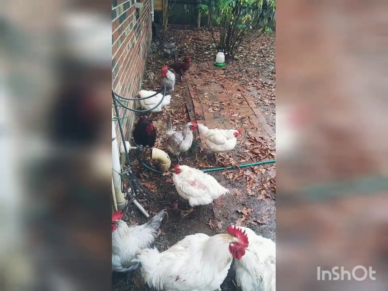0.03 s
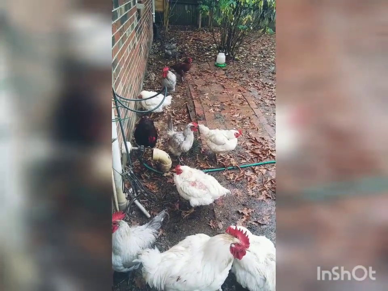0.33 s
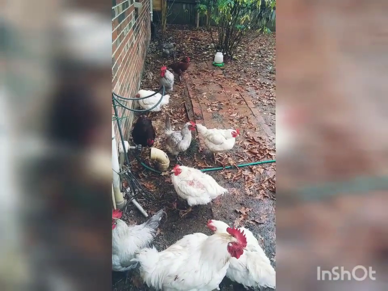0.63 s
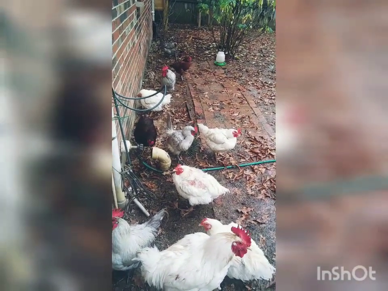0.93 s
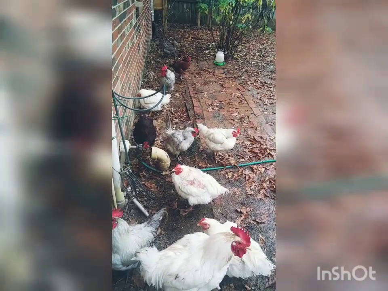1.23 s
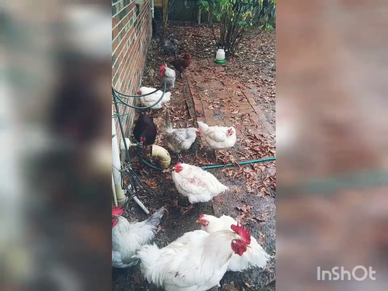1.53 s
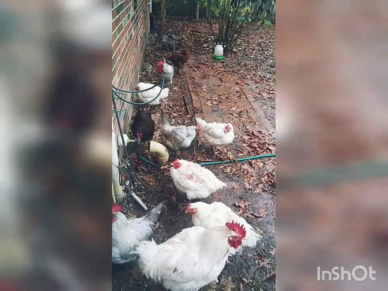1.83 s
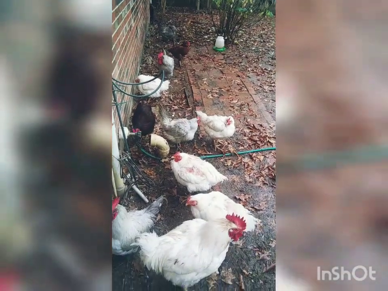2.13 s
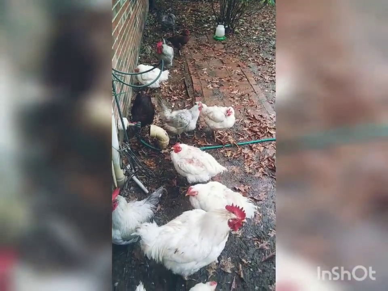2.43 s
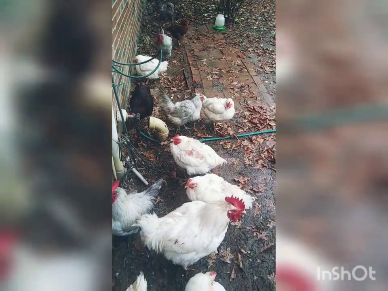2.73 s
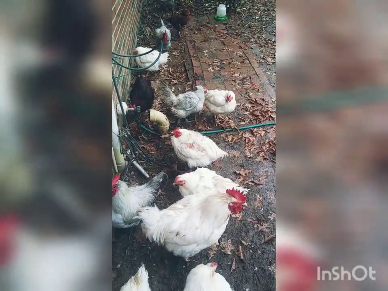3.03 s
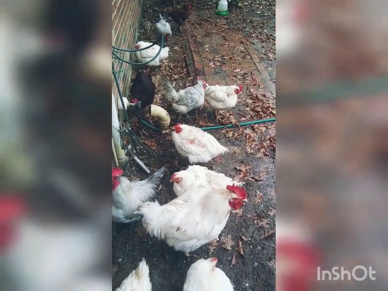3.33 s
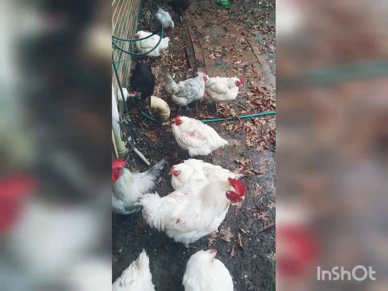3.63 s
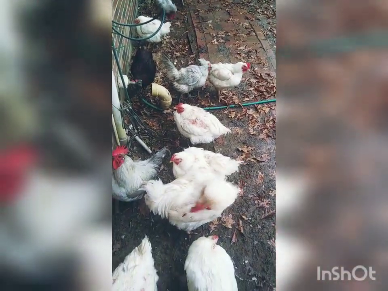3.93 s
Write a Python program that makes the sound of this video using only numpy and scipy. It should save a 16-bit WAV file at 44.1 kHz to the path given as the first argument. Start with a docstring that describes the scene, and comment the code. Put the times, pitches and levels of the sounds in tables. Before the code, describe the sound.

Faint, scattered raindrops tick in a yard, with occasional hen clucks over a low hum.

```python
"""Chicken yard in light rain.

Single drops splat on wet ground and leaves and plink in puddles. Hens give three hoarse clucks,
pulses and breath ringing the throat, and a few soft ones with the beak closed. Feet shuffle on soil.
A wall and fence throw back a short echo of the drops and hens. Two soft thumps bump the microphone,
and a distant motor hums over a low rumble and faint hiss."""
import sys
import numpy as np
from scipy import signal
from scipy.fft import rfft, irfft
from scipy.io import wavfile
from scipy.ndimage import uniform_filter1d

SR = 44100
rng = np.random.default_rng(int(sys.argv[2]) if len(sys.argv) > 2 else 0)


def bounce(signal):
    """Save signal as a 16-bit WAV file at the path given by the first command-line argument."""
    frames = np.transpose(np.atleast_2d(signal))
    limited = np.clip(frames, -1, 1)
    pcm = np.round(limited * 32767).astype(np.int16)
    wavfile.write(sys.argv[1], SR, pcm)


N = 176400

# spectra of the background noise (frequency [Hz], relative level [dB])
RUMBLE_SPECTRUM = [(20, -24.5), (40, -29.5), (54, 1.5), (70, -2.5), (92, 3.5), (135, 0.5), (175, -4),
                   (205, -14), (250, -16.5), (320, -33), (450, -40), (700, -62.5)]
HISS_SPECTRUM = [(100, -1), (500, 0.5), (700, 3.5), (1000, 0), (1800, -2), (2800, -2.5), (4000, -5.5),
                 (6300, -7), (9000, -10.5), (15500, -12)]
# feet on the soil (time [s], level [dB])
FOOT_SHUFFLES = [(0.598, -68), (1.348, -69.5), (2.21, -62.5), (2.551, -65), (2.849, -67.5), (3.359, -63.5),
                 (3.469, -65)]
# bumps on the microphone (time [s], pitch [Hz], level [dB])
MIC_THUMPS = [(2.534, 106.5, -38.5), (2.808, 104, -41)]
# drops on wet ground and leaves (time [s], centre [Hz], width [Hz], level [dB])
GROUND_SPLATS = [(.414, 2680, 604, -60.5), (.414, 5240, 497, -68), (.560, 2810, 394, -70),
                 (.585, 2790, 520, -63.5), (.415, 3800, 350, -78), (.586, 3570, 249, -75),
                 (.634, 7080, 420, -72), (.708, 2168, 394, -57.5), (.634, 8300, 730, -75),
                 (1.033, 8040, 1010, -76.5), (1.192, 2790, 490, -72), (1.194, 6600, 510, -75),
                 (1.462, 3210, 304, -70), (1.480, 3270, 950, -61.5), (1.899, 2760, 450, -69),
                 (2.195, 6430, 607, -75.5), (2.211, 8130, 500, -81), (2.246, 2860, 900, -64),
                 (2.255, 2640, 844, -57.5), (2.285, 2900, 616, -76), (2.325, 10200, 2000, -79),
                 (2.535, 793, 178, -68.5), (2.688, 6860, 730, -62), (2.827, 2380, 449, -64.5),
                 (2.830, 4240, 350, -75), (2.831, 5600, 403, -74.5), (2.903, 3030, 806, -51.5),
                 (2.903, 6600, 400, -74), (2.905, 4230, 290, -72.5), (3.530, 8600, 610, -79.5),
                 (3.592, 5900, 518, -67), (3.743, 3130, 605, -69)]
# drops ringing in puddles and on hard things (time [s], pitch [Hz], level [dB])
PUDDLE_PLINKS = [(.018, 6170, -73.5), (.051, 3650, -73), (.061, 5130, -75), (.144, 4090, -77),
                 (.248, 2830, -73.5), (.301, 6600, -78), (.425, 6960, -74), (.711, 2216, -56.5),
                 (.751, 3730, -72.5), (.751, 6190, -75.5), (.751, 7670, -80), (1.140, 5310, -77),
                 (1.349, 13200, -81), (1.636, 2220, -76), (1.638, 3150, -75), (1.798, 2290, -74),
                 (1.818, 3020, -75.5), (1.848, 4940, -75.5), (2.003, 4520, -66.5), (2.185, 2650, -65),
                 (2.210, 2606, -67), (2.321, 9360, -82), (2.356, 6600, -69), (2.358, 3710, -75),
                 (2.367, 4920, -77), (2.809, 1743, -67), (3.074, 11400, -78.5), (3.411, 7500, -83),
                 (3.435, 2910, -77.5), (3.528, 3060, -69.5), (3.528, 5010, -75), (3.528, 7000, -82),
                 (3.591, 4850, -71.5), (3.835, 6650, -77), (3.887, 6680, -77.5), (3.982, 3040, -70)]
# closed-beak clucks (time [s], pitch [Hz], level [dB])
SOFT_CLUCKS = [(1.046, 383, -67), (1.510, 723, -70.5), (3.225, 591, -61.5)]
# a hen's throat resonances, one set a syllable (centre [Hz], width [Hz], relative level [dB])
THROAT_LOW = [(256, 123, 7), (600, 49, -0.5), (757, 36, 3), (1120, 57, -7), (1263, 29, -5),
              (1810, 190, -4.5), (2190, 160, -1.5), (2696, 140, -2), (2930, 180, -6.5), (3350, 70, -11.5)]
THROAT_CLOSING = [(260, 110, 4), (610, 100, 1.5), (780, 60, -6), (1093, 43, 2.5), (2610, 62, -10),
                  (3050, 230, -14)]
THROAT_LOUD = [(722, 84, 3), (894, 67, -7), (1100, 150, -4), (1290, 49, -7), (1836, 140, 3),
               (2280, 160, -2), (2587, 100, -0.5), (2940, 570, 0.5), (4070, 110, -12), (4600, 550, -4.5),
               (5260, 260, -17.5), (7160, 1100, -12.5), (8340, 330, -20)]
THROAT_SOFT = [(670, 127, 5.5), (1182, 55, -6), (1440, 370, -5), (1970, 100, -23), (2683, 150, -1),
               (3000, 62, -8), (4010, 130, -17)]
# hoarse clucks, the first in two syllables
# (time [s], length [s], pulse rate [Hz], level [dB], lag of low resonances [s/octave], throat [table])
HOARSE_CLUCKS = [(0.294, 0.023, 163.2, -49.5, 0.00023, THROAT_LOW),
                 (.329, 0.015, 164, -54, 0.00023, THROAT_CLOSING),
                 (2.690, 0.024, 229.6, -42, 0.0019, THROAT_LOUD),
                 (3.792, 0.026, 210.4, -53.5, 0.0015, THROAT_SOFT)]

LEVEL_WINDOW_S, TOP_HZ = .03, 15800
YARD_T60_S, EARLY_DECAY_S, EARLY_DB, FIRST_ECHO_S, TAIL_LOW_HZ = 0.32, 0.0098, 6.5, 0.0025, 800
RUMBLE_DB, HISS_DB, RUMBLE_SWELL_DB, HISS_SWELL_DB = -49, -73, 1.12, 0.4
HUM_HZ, HUM_DB, HUM_SECOND_DB, HUM_WAVER_DB, HUM_DRIFT = 120.95, -49, -76.5, 1, 0.0063
DRIZZLE_PER_S, DRIZZLE_DB, DRIZZLE_HZ, DRIZZLE_OCTAVES = 26, -84.5, 3700, 1.1
SPRAY_DB, SPRAY_S = -7.5, 0.0022
PLINK_ATTACK_S, PLINK_DECAY_S, PLINK_WET_DB = .0055, .0035, -4
SOFT_CLUCK_S, SOFT_FALL_PER_S = 0.026, 1.8
CLUCK_ATTACK_S, CLUCK_RELEASE_S, CLUCK_RASP, CLUCK_JITTER, LAG_BELOW_HZ = 0.0023, 0.015, 0.53, .12, 2500


def undb(db):
    """Decibels to gain."""
    return 10 ** (np.asarray(db) / 20)


def unit(x):
    """Scale to an rms of one."""
    return x / np.sqrt(np.mean(x ** 2) + 1e-30)


def event_time():
    """Half a second of time for one event."""
    return np.arange(SR // 2) / SR


def add(out, x, start, db):
    """Mix in an event; its level is its energy spread over the level window."""
    i = max(int(start * SR), 0)
    x = x * undb(db) * np.sqrt(LEVEL_WINDOW_S * SR / np.sum(x ** 2))
    out[i:i + len(x)] += x[:max(N - i, 0)]


def resonate(x, hz, width):
    """A resonance applied twice, for steep skirts."""
    b, a = signal.iirpeak(hz, hz / width, fs=SR)
    return signal.lfilter(b, a, signal.lfilter(b, a, x))


def band(x, hz, width):
    """A steep band-pass."""
    edges = [hz - width / 2, hz + width / 2]
    return signal.sosfilt(signal.butter(4, edges, "bandpass", fs=SR, output="sos"), x)


def drift(per_s):
    """Smooth random drift with an rms of one."""
    hold = int(SR / per_s)
    steps = np.repeat(rng.standard_normal(N // hold + 1), hold)
    return unit(uniform_filter1d(uniform_filter1d(steps, hold), hold)[:N])


def coloured(spectrum):
    """Noise shaped to points of (frequency [Hz], level [dB])."""
    hz, db = np.array(spectrum).T
    bin_hz = np.maximum(np.arange(N // 2 + 1) * SR / N, 1)
    gain = undb(np.interp(np.log(bin_hz), np.log(hz), db))
    return unit(irfft(rfft(rng.standard_normal(N)) * gain, N))


def ring(hz, attack_s, decay_s, glide_per_s=0):
    """A tone that swells, dies away and may glide."""
    t = event_time()
    tone = np.sin(2 * np.pi * hz * (t + glide_per_s * t ** 2 / 2))
    return tone * (1 - np.exp(-(t / attack_s) ** 2)) * np.exp(-t / decay_s)


def yard_echo(x, wet_db):
    """Direct sound plus early echoes off wall and fence and a thin tail, different for each spot."""
    t = event_time()
    early, tail = rng.standard_normal((2, len(t))) * (t > FIRST_ECHO_S)
    early *= undb(EARLY_DB) * np.exp(-t / EARLY_DECAY_S)
    tail = signal.lfilter(*signal.butter(1, TAIL_LOW_HZ, "highpass", fs=SR), tail)
    tail *= np.exp(-np.log(1000) * t / YARD_T60_S)
    echo = signal.fftconvolve(x, early + tail)[:len(t)]
    return unit(x) + undb(wet_db) * unit(echo)


def background():
    """Low rumble and faint hiss behind the yard, each swelling slightly."""
    rumble = coloured(RUMBLE_SPECTRUM) * undb(RUMBLE_DB + RUMBLE_SWELL_DB * drift(per_s=2))
    hiss = coloured(HISS_SPECTRUM) * undb(HISS_DB - HISS_SWELL_DB * drift(per_s=14))
    return rumble + hiss


def distant_motor():
    """A far-off hum and its faint octave, wavering in pitch and level."""
    phase = 2 * np.pi * np.cumsum(HUM_HZ * (1 + HUM_DRIFT * drift(per_s=10))) / SR
    hum = np.sqrt(2) * (undb(HUM_DB) * np.sin(phase) + undb(HUM_SECOND_DB) * np.sin(2 * phase))
    return hum * undb(HUM_WAVER_DB * drift(per_s=9.88))


def shuffling_feet():
    """Feet scuff the soil in short puffs of low noise."""
    out, t = np.zeros(N), event_time()
    for start, db in FOOT_SHUFFLES:
        scuff = rng.standard_normal(len(t)) * t * np.exp(-t / 0.017)  # peaks at 17 ms
        add(out, resonate(scuff, hz=273, width=166), start, db)
    return out


def microphone_bumps():
    """Dull thumps with a small knock on top, right on the microphone and so without echo."""
    out = np.zeros(N)
    for start, hz, db in MIC_THUMPS:
        thump = ring(hz, attack_s=0.0031, decay_s=0.01)
        knock = ring(hz=336, attack_s=.002, decay_s=.005)
        add(out, -thump, start, db)
        add(out, -knock, start, db - 18)
    return out


def drizzle():
    """Faint drops ring all over the yard at random times and pitches."""
    out = np.zeros(N)
    for when, pitch, size in rng.random((int(DRIZZLE_PER_S * N / SR), 3)):
        hz = DRIZZLE_HZ * 2 ** (DRIZZLE_OCTAVES * (2 * pitch - 1))
        db = DRIZZLE_DB + min(-np.log(1 - size), 2)  # bigger drops are up to 2 dB louder
        drop = ring(hz, PLINK_ATTACK_S, PLINK_DECAY_S)
        add(out, yard_echo(drop, PLINK_WET_DB), when * N / SR, db)
    return out


def ground_splats():
    """A drop hits wet ground or a leaf: a rounded tick, then a brief spray."""
    out, t = np.zeros(N), event_time()
    for start, hz, width, db in GROUND_SPLATS:
        tick = band(signal.unit_impulse(len(t)), hz, width)
        spray = band(rng.standard_normal(len(t)) * t * np.exp(-t / SPRAY_S), hz, width)
        splat = unit(tick) + undb(SPRAY_DB) * unit(spray)
        rise_s = 1 / width  # a narrow band takes longer to peak
        add(out, yard_echo(splat, wet_db=0.5), start - rise_s, db)
    return out


def puddle_plinks():
    """A drop lands in a puddle or on something hard and rings briefly."""
    out = np.zeros(N)
    for start, hz, db in PUDDLE_PLINKS:
        plink = ring(hz, PLINK_ATTACK_S, PLINK_DECAY_S, glide_per_s=0.33)
        add(out, yard_echo(plink, PLINK_WET_DB), start - PLINK_ATTACK_S / 2, db)
    return out


def soft_clucks():
    """With her beak closed, a hen makes a short, slightly falling tone."""
    out, t = np.zeros(N), event_time()
    for start, hz, db in SOFT_CLUCKS:
        tone = np.sin(2 * np.pi * hz * (t - SOFT_FALL_PER_S * t ** 2 / 2))
        swell = np.sin(np.pi * np.minimum(t / SOFT_CLUCK_S, 1))
        add(out, yard_echo(tone * swell, wet_db=-10), start, db)
    return out


def hoarse_clucks():
    """Uneven pulses and rasping air ring a hen's throat, treble first."""
    out, t = np.zeros(N), event_time()
    for start, length, pulse_hz, db, lag, throat in HOARSE_CLUCKS:
        jitter = unit(uniform_filter1d(rng.standard_normal(len(t)), SR // 200))
        cycles = np.cumsum(pulse_hz * (1 + CLUCK_JITTER * jitter)) / SR
        pulses = unit(np.diff(np.floor(cycles), prepend=-1))
        air = unit(np.exp(-2 * (cycles % 1)) * rng.standard_normal(len(t)))  # a puff after each pulse
        voice = (1 - CLUCK_RASP) * pulses + CLUCK_RASP * air
        cluck = np.zeros(len(t))
        for hz, width, resonance_db in throat:
            age = t - lag * max(np.log2(LAG_BELOW_HZ / hz), 0)
            attack = np.clip(age / CLUCK_ATTACK_S, 0, 1)
            release = np.exp(-np.maximum(age - length, 0) / CLUCK_RELEASE_S)
            cluck += undb(resonance_db) * unit(resonate(voice * attack * release, hz, width))
        add(out, yard_echo(cluck, wet_db=-2.5), start, db)
    return out


def scene():
    """The whole yard at one microphone."""
    ambience = background() + distant_motor()
    drops = ground_splats() + puddle_plinks()
    hens = hoarse_clucks() + soft_clucks()
    return (ambience + shuffling_feet() + microphone_bumps() + drizzle() + drops + hens)[None]


def record(dry):
    """The recorder cuts the highest treble steeply."""
    return signal.sosfilt(signal.ellip(10, .1, 80, TOP_HZ, fs=SR, output="sos"), dry)


dry = scene()
out = record(dry)
bounce(out)
```